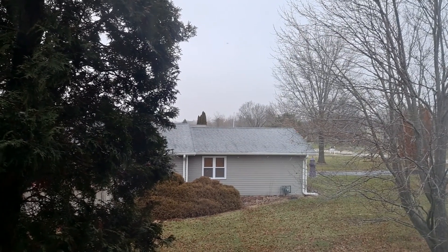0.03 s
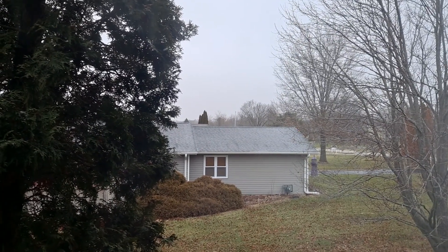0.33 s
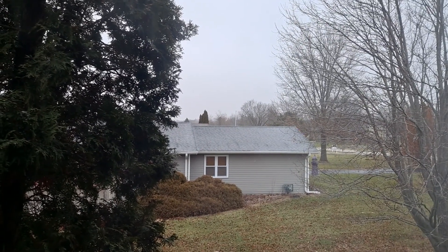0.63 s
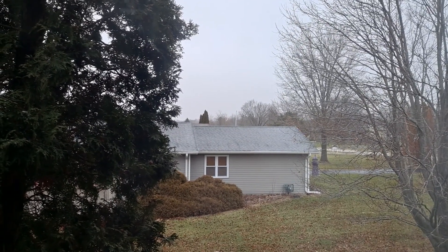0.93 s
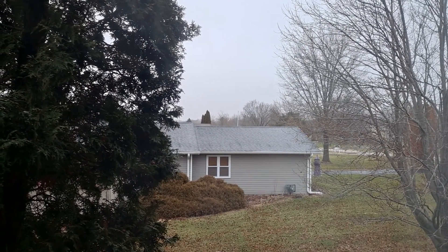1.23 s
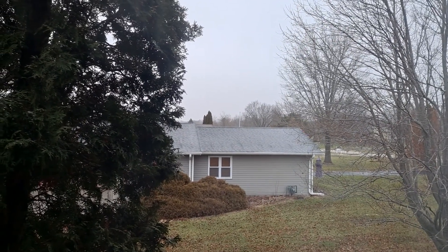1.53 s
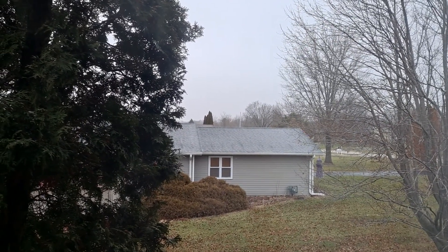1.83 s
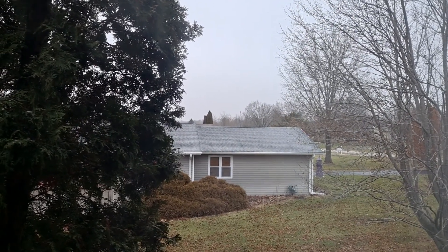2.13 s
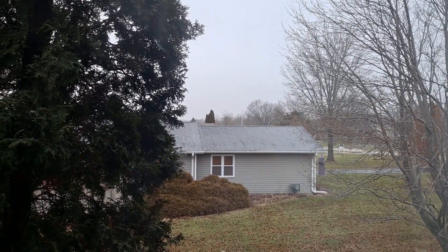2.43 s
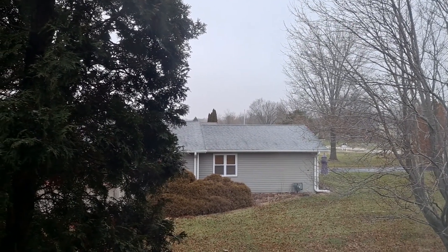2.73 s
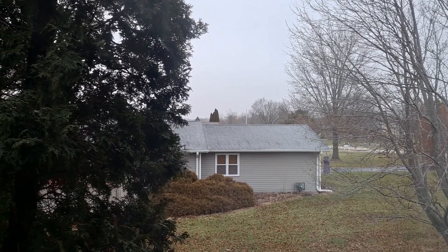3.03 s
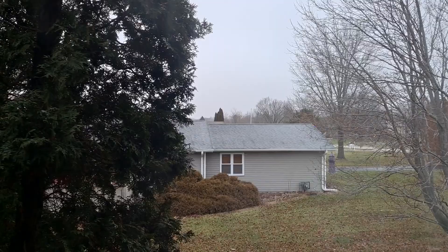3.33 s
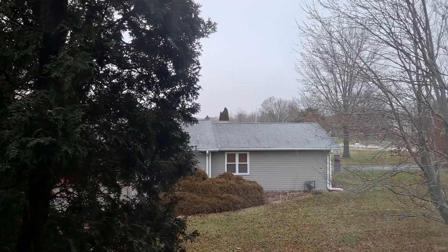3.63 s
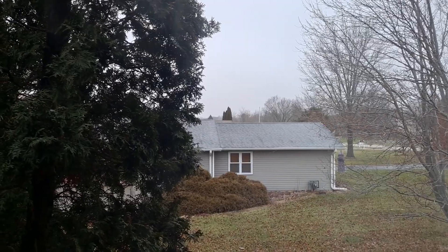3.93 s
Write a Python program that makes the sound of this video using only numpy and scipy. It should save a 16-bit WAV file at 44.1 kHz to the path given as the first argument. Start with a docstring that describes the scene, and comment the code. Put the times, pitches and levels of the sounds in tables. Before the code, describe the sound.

Steady pulsing motor hum in a quiet yard, with a few light raindrop ticks.

```python
"""A house by a yard on a quiet, damp day. Low air rumbles under a faint hiss, and a motor hums,
throbbing slowly as its spinning part slips against the mains power. Sparse drops tick nearby: each hit
makes a snap, a short spatter, a ring and a brief echo, and a few knock on something hollow.
Near the start, the microphone is softly bumped twice."""
import sys
import numpy as np
from scipy import signal
from scipy.fft import rfft, irfft
from scipy.io import wavfile
from scipy.ndimage import uniform_filter1d

SR = 44100
rng = np.random.default_rng(int(sys.argv[2]) if len(sys.argv) > 2 else 0)


def dump(signal):
    """Clip the signal to [-1, 1] and save it as 16-bit WAV at the path in sys.argv[1]."""
    limited = np.clip(np.atleast_2d(signal).T, -1, 1)
    pcm = np.round(limited * 32767).astype(np.int16)
    wavfile.write(sys.argv[1], SR, pcm)


N = 176400  # 4 seconds

# how the low middle pitches of both air and motor rise and fall: (time [s], boost [dB])
MID_SWELL = [(0, -2), (.68, 1.5), (.85, 1.5), (1.0, 7), (1.2, -1.5), (1.45, 3.5), (1.68, -2.5), (1.85, 1),
             (2.53, -4), (2.67, 2.5), (3.08, -2.5), (3.45, 1.5), (3.7, 0.5), (3.8, 2.5), (3.92, -4)]
MID_HZ, MID_OCTAVES = 640, 0.35  # centre and width of that range


def amp(db):
    """Turns decibels into a number to multiply by."""
    return 10 ** (np.asarray(db) / 20)


def unit_level(x):
    """Scales a signal so that its average strength (rms) is 1."""
    return x / np.sqrt(np.mean(x ** 2) + 1e-20)


def over_time(points, t):
    """Joins (time, value) points with straight lines."""
    return np.interp(t, *np.transpose(points))


def over_pitch(points, hz):
    """Joins (frequency, values...) points on an octave scale, giving one row per value column."""
    freqs, *columns = np.transpose(points)
    return np.array([np.interp(np.log(hz + 1), np.log(freqs + 1), column) for column in columns])


def bell(hz, centre_hz, octaves):
    """A smooth hill of height 1 around one pitch."""
    return np.exp(-(np.log2((hz + 1) / centre_hz) / octaves) ** 2)


def drift(t, low_hz, high_hz):
    """A random wobble of strength 1, made of 20 slow waves."""
    rates = np.geomspace(low_hz, high_hz, 20)
    return unit_level(sum(np.sin(2 * np.pi * (f * t + rng.random())) / np.sqrt(f) for f in rates))


def shape_tone(x, gain_db):
    """Turns each frequency up or down, with a filter that rings after a hit, not before it."""
    cepstrum = irfft(np.log(amp(gain_db)))
    half = cepstrum.shape[1] // 2
    fold = np.r_[1, np.full(half - 1, 2), 1, np.zeros(half - 1)]
    return irfft(rfft(x) * np.exp(rfft(cepstrum * fold)))


def add(mix, start_s, sound):
    """Mixes a stereo sound in at its start time."""
    part = mix[:, max(round(start_s * SR), 0):][:, :sound.shape[1]]
    part += sound[:, :part.shape[1]]


def air(size=4096):
    """Air noise: a low rumble and a faint hiss that swell gently, with one wandering resonance."""
    # the air's basic tone: (frequency [Hz], left [dB per Hz], right [dB per Hz])
    air_tone = [(19.1, -99, -92), (31.7, -83.5, -97), (43.8, -87, -67.5), (67, -78.5, -70), (91, -74, -73),
                (181, -78, -76.5), (248, -76, -73.5), (302, -80, -77.5), (369, -76.5, -73.5),
                (443, -90.5, -83.5), (553, -88.5, -90), (663, -94, -92.5), (780, -100, -102),
                (1030, -102, -105), (1095, -100, -105), (1306, -98.5, -111), (1695, -93, -107),
                (1810, -99, -107), (2086, -112, -111), (2660, -115, -111), (3160, -111.5, -101.7),
                (3700, -119, -111), (4100, -120, -116), (7900, -121, -117), (9150, -123, -118),
                (10800, -119, -118), (12300, -123, -120), (15700, -121, -123)]
    # how alike the two sides are: (frequency [Hz], likeness [0-1])
    side_likeness = [(30, 0.86), (75, 0), (170, 0.9), (370, 1), (480, 0.2), (700, 0.45), (1100, 0.07),
                     (3000, 0.04)]
    # how far the left wave runs ahead of the right: (frequency [Hz], lead [radians])
    left_lead = [(60, 0.93), (230, 0.59), (420, 0.52), (650, -0.34), (1600, -1.8)]
    # rise and fall of the treble hiss: (time [s], boost [dB])
    hiss_swell = [(0, 0.2), (.3, 0), (.8, 0.2), (1.5, 0.5), (2.0, 2.5), (2.5, -0.5), (2.95, 2), (3.6, -1),
                  (4, 4)]
    # rise and fall of the sizzle near 3 kHz: (time [s], boost [dB])
    sizzle_swell = [(0, -6.5), (.35, -2.5), (.85, -3.5), (1.16, 1), (1.4, -2.5)]
    # path of the faint resonance: (time [s], pitch [Hz])
    resonance_path = [(.42, 1670), (.63, 1500), (.8, 1660), (1.85, 1540), (2.7, 1700), (2.97, 1530),
                      (3.1, 1720)]
    hop = size // 4
    frames, hz = N // hop + 5, np.fft.rfftfreq(size, 1 / SR)
    t = np.arange(frames) * hop / SR
    # noise on a grid: one row per frequency, one column per moment
    a, b, c, d, patches = rng.standard_normal((frames, len(hz), 5)).T
    left, unrelated = a + 1j * b, c + 1j * d
    likeness = np.clip(over_pitch(side_likeness, hz).T, 0, 1)
    right = likeness * left + np.sqrt(1 - likeness ** 2) * unrelated
    right *= np.exp(-1j * over_pitch(left_lead, hz).T)
    patches = uniform_filter1d(uniform_filter1d(patches, size=24, axis=0), size=5, axis=1)
    change_db = unit_level(patches) - 0.46 * drift(t, 0.478, 1.75)  # slight patches, slow swell
    row_hz = hz[:, None]
    change_db += np.clip((row_hz - 2000) / 2000, 0, 1) * over_time(hiss_swell, t)
    change_db += bell(row_hz, MID_HZ, MID_OCTAVES) * over_time(MID_SWELL, t)
    change_db += bell(row_hz, centre_hz=3200, octaves=0.23) * over_time(sizzle_swell, t)
    resonance_db, width_hz = 3.5, 115
    change_db += resonance_db * np.exp(-((row_hz - over_time(resonance_path, t)) / width_hz) ** 2)
    gain = amp(over_pitch(air_tone, hz)[:, :, None] + change_db) * np.sqrt(1.5 * SR / size)
    return signal.istft(np.array([left, right]) * gain, nperseg=size, noverlap=size - hop)[1][:, :N]


def motor():
    """Mains hum and overtones throb and sway as the spinning part slips; a thin whine sits on top."""
    # tones of the hum: (multiple of the hum pitch, left [dB], right [dB], throb depth [dB],
    # time of one throb's peak [s])
    hum_tones = [(1, -46, -40.5, -15.5, 1.985), (2, -64, -62, -6, 1.943), (3, -72, -70.5, -3, 2),
                 (4, -65.5, -70.5, -6.5, 2.17), (5, -69.5, -72.5, -9.5, 2.24), (6, -77.5, -86, -6.5, 2.25)]
    hum_hz, throb_hz, whine_hz = 120, 2.52, 3050
    sway_rad, left_lead_rad = 0.2, 0.56
    t, hum = np.arange(N) / SR, np.zeros((2, N))
    for multiple, left_db, right_db, depth_db, peak_s in hum_tones:
        hz = multiple * hum_hz
        slip = 2 * np.pi * throb_hz * (t - peak_s)
        phase = 2 * np.pi * (hz * t + rng.random()) + multiple * sway_rad * np.sin(slip)
        waver_db = np.sqrt(multiple) * np.interp(t, t[::100], drift(t[::100], 3, 14))
        swell_db = bell(hz, MID_HZ, MID_OCTAVES) * over_time(MID_SWELL, t)
        level = amp(waver_db + swell_db) * (1 + amp(depth_db) * np.cos(slip))
        hum += amp([[left_db], [right_db]]) * level * np.cos([phase + left_lead_rad, phase])
    whine = amp([[-101.5], [-83]]) * np.sin(2 * np.pi * whine_hz * t)  # mostly on the right
    return hum + whine


def bump(pitch_hz, rise_s, left_db, right_db):
    """A soft bump on the microphone: a few low waves that swell, sag in pitch and die away."""
    age = np.arange(SR // 2) / SR / rise_s  # 1 at the loudest point
    cycles = pitch_hz * rise_s * (age - 0.1 * (age - 1 + np.exp(-age)))  # pitch sags by a tenth
    swell = (age * np.exp(1 - age)) ** 3
    return amp([[left_db], [right_db]]) * swell * np.cos(2 * np.pi * cycles)


def knock(pitch_hz, left_db, right_db, size=16384):
    """A drop hits something hollow: a short pitched tock, and noise that rings around that pitch."""
    width_hz, onset_s = 300, 0.0011
    tock_fade_s, hollow_fade_s = 0.09, 0.18  # time to fall by 60 dB
    t, hz = np.arange(size) / SR, np.fft.rfftfreq(size, 1 / SR)
    resonance_db = -40 * np.log10(1 + ((hz - pitch_hz) / width_hz) ** 2 / 2)
    noise = unit_level(shape_tone(rng.standard_normal((2, size)), resonance_db[None]))
    hollow = noise * amp(-60 * t / hollow_fade_s) * (1 - np.exp(-t / onset_s))
    tock = amp(2 - 60 * t / tock_fade_s) * np.sin(2 * np.pi * pitch_hz * t)
    return amp([[left_db], [right_db]]) * (tock + hollow)


def drop(level_db, body_db, top_db, snap_db, ring_hz, echo_db, size=16384):
    """A drop lands: a snap, a grainy spatter, a thin echo, and the short ring of the spot it hits."""
    # the tone all drops share: (frequency [Hz], left [dB], right [dB])
    drop_tone = [(450, -15, -13.5), (1200, -3.5, -6), (1770, 13, -0.5), (2470, -18.5, -4), (3040, 4, 3),
                 (3780, -36, 1.5), (5140, -15, 3), (7150, -2, 2), (9250, 3.5, 3.5), (10400, 3.5, 5.5),
                 (12800, -5, 5), (15500, -18, -10)]
    # pure notes of the spot that is hit: (multiple of its ring pitch, level [dB])
    ping_notes = [(.78, -15), (1, -12.5), (1.2, -22)]
    snap_s, spatter_s, onset_s, ring_width_hz = 0.0023, 0.0099, 0.0011, 420
    ping_fade_s, ring_fade_s, echo_fade_s = 0.067, 0.14, 0.45  # time to fall by 60 dB
    t, hz = np.arange(size) / SR, np.fft.rfftfreq(size, 1 / SR)
    snap, spatter, echo, ring = rng.standard_normal((4, 2, size))  # each starts as stereo noise
    snap *= np.exp(-t / snap_s)
    roughness = unit_level(uniform_filter1d(rng.standard_normal(size), size=30))
    grains = unit_level(np.exp(0.96 * roughness))
    spatter *= amp(-3) * grains * np.exp(-t / spatter_s)
    echo = shape_tone(echo, over_pitch([(1910, -5.5), (4500, 0)], hz))  # weaker lows make it thin
    echo *= amp(echo_db - 60 * t / echo_fade_s)
    ring = shape_tone(ring, -20 * np.log10(1 + ((hz - ring_hz) / ring_width_hz) ** 2)[None])
    ring *= amp(7 - 60 * t / ring_fade_s)
    ping = sum(amp(db - 60 * t / ping_fade_s) * np.sin(2 * np.pi * multiple * ring_hz * t)
               for multiple, db in ping_notes)
    hit = amp(snap_db) * (snap + ping) + (spatter + echo + ring) * (1 - np.exp(-t / onset_s))
    spot_db = over_pitch([(1910, body_db + 1.5), (4500, 0), (7230, 0), (8900, top_db + 4)], hz)
    return amp(level_db - 2.5) * shape_tone(hit, over_pitch(drop_tone, hz) + spot_db)


def scene():
    """Drops, hollow knocks and bumps over the air and the motor."""
    # drops landing nearby, with relative levels: (time [s], level [dB], lower tones [dB],
    # top treble [dB], snap and ping [dB], ring pitch [Hz], echo [dB])
    drops = [(0.1364,-61,6,-15,3,5000,0), (0.1428,-56.5,9.5,-20,4,4900,-4),
             (0.28,-68,14.5,-15,-10,6300,1.5), (0.345,-67.5,4,-8,8,3150,-5),
             (0.581,-62,9.5,-14,-4,6460,-4.5), (0.593,-64.5,3,-14,3,7260,-6), (0.7078,-65,1,-15,-1,6830,-6),
             (1.0255,-63,-1,-2,4.5,7230,-7.5), (1.118,-66.5,2,-16,6,6260,0),
             (1.6162,-52,-2,-16,4.5,6200,-6.5), (1.6286,-52.5,-8,-24.5,4,5640,-9),
             (1.6907,-63,7.5,-16,10.5,3250,-2), (1.8179,-64,14,-16,-4,7050,-4),
             (1.924,-66.5,1,-15,3,6700,1.5), (2.0362,-57.5,8.5,-26,5.5,5300,-5.5),
             (2.0844,-55.5,4,-40,10,4930,-3), (2.167,-60.5,-1,-21,0,6000,-5), (2.205,-62.5,2,-26,4,5900,-7),
             (2.2808,-55.5,7.5,-27,1,4990,-5), (2.611,-62,9.5,-6.5,6.5,3130,-5.5),
             (2.629,-67,12,-19,5.5,7260,-2), (2.7432,-62.5,11,-10.5,0,7580,-8),
             (3.005,-62,-14,-9.5,-1,6340,-7), (3.11,-66,-6,-20,6.5,5400,-4), (3.7584,-67,17,3,-2,7000,-11),
             (3.789,-68,8,-1.5,8,6960,-6), (3.8785,-60.5,2,-11.5,-2,6200,-5.5),
             (3.9378,-60,6,-11,8,6240,-10)]
    # drops on something hollow: (time [s], pitch [Hz], left [dB], right [dB])
    knocks = [(0.142, 1294, -62, -68), (0.345, 880, -72, -63), (0.58, 1430, -62, -80),
              (2.2805, 1540, -55.5, -68), (2.61, 1720, -61, -69)]
    # bumps on the microphone: (time [s], pitch [Hz], rise time [s], left [dB], right [dB])
    bumps = [(0.236, 76, .022, -30, -45), (0.341, 63, 0.02, -49, -41.5)]
    mix = air() + motor()
    for source, events in (drop, drops), (knock, knocks), (bump, bumps):
        for start_s, *settings in events:
            add(mix, start_s, source(*settings))
    return mix


def record(dry):
    """Takes away the deepest rumble and the very highest treble."""
    low_cut_hz, high_cut_hz = 39, 15720
    low_cut = signal.butter(4, low_cut_hz, "highpass", fs=SR, output="sos")
    high_cut = signal.firwin(1023, high_cut_hz, window=("kaiser", 9), fs=SR)
    return signal.oaconvolve(signal.sosfilt(low_cut, dry), high_cut[None], "same")


dry = scene()
out = record(dry)
dump(out)
```